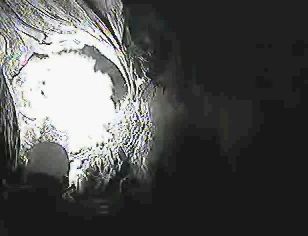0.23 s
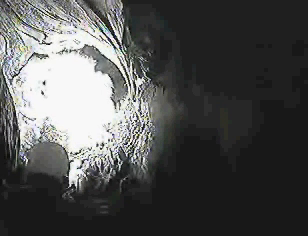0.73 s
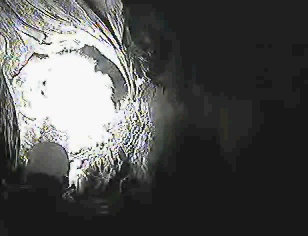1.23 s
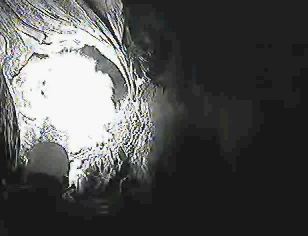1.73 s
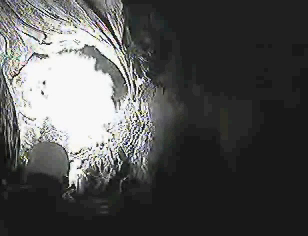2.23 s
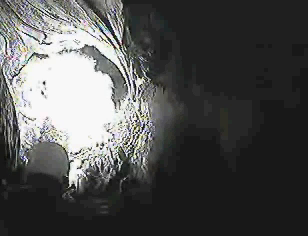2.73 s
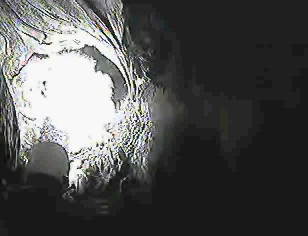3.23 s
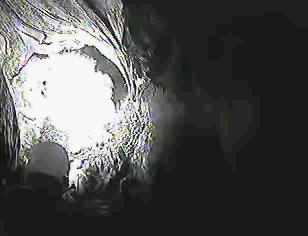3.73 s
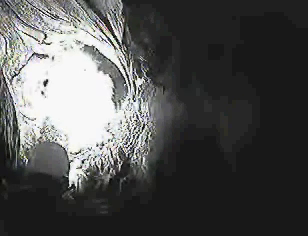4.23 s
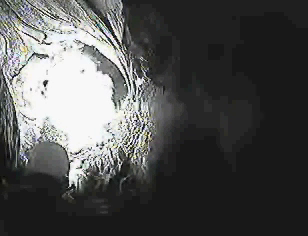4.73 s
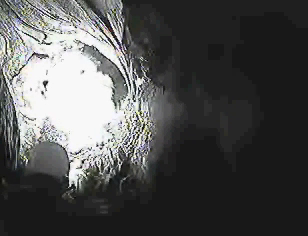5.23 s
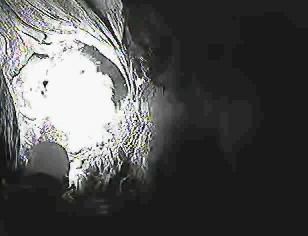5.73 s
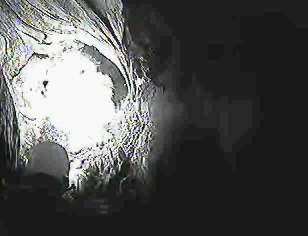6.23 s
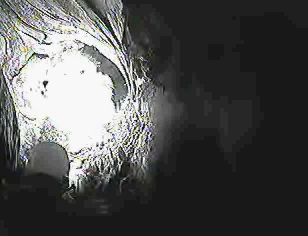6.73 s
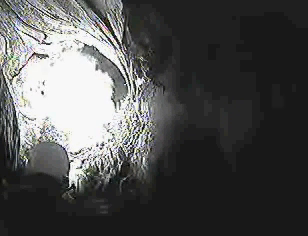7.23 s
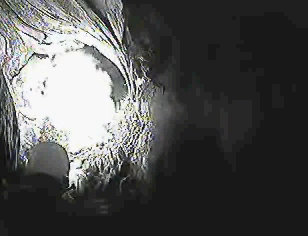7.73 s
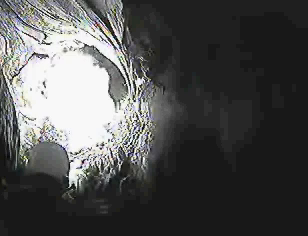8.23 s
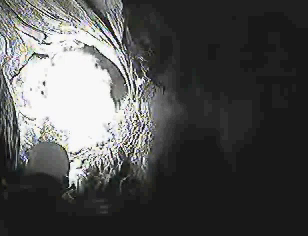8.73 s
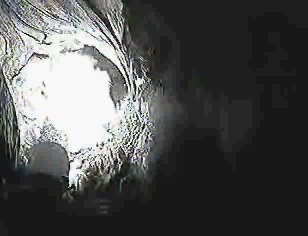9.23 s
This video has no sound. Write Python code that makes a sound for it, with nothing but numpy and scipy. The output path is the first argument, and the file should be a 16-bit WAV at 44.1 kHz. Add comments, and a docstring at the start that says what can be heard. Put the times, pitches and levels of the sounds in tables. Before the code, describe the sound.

A barn owl chick in a nest box hisses harshly four times, so close to a small microphone that the sound distorts. The first hiss is already ending; the others last about half a second each, with small beak clicks. Outside, faint tree frogs, a cricket and short distant whistles sit in a steady background hiss. At the end a far owl gives one long, hoarse screech.

```python
"""A harsh hiss, already under way: a barn owl chick in a nest box, so close to a small camera microphone
that the amplifier overloads. It hisses four times: turbulent air in the throat's resonances, rung on by
the box, with beak clicks as it opens and shuts. Outside and well off the microphone, over a steady
background hiss: tree frogs, a cricket, faint whistles and, at the end, a far owl's long screech."""
import sys
import numpy as np
from scipy import signal
from scipy.io import wavfile

SR = 44100
rng = np.random.default_rng(int(sys.argv[2]) if len(sys.argv) > 2 else 0)


def unload_wav(signal):
    """Save mono or channel-first audio to the path in sys.argv[1] as 16-bit WAV at rate SR, clipped to [-1, 1]."""
    wavfile.write(
        sys.argv[1],
        SR,
        np.round(np.clip(np.atleast_2d(signal).T, -1, 1) * 32767).astype(np.int16),
    )


N = 417627

# spectrum of the steady background outside the box: frequency_hz, relative_db
BACKGROUND_SPECTRUM = [(40, -13.5), (145, -11.5), (190, -4.5), (270, -1), (430, 0.5), (540, -4.5),
                       (880, -5), (1200, -3), (1900, -3), (3400, -8), (4600, -9.5), (8300, -22),
                       (10000, -29.5), (12000, -47.5)]
# croaks of one far tree frog: first_note_last_pulse_s, peak_db
FROG_CROAKS = [(1.041, -52.5), (3.918, -51.3), (6.926, -52.3)]
# the two notes of each croak: last_pulse_delay_s, pulse_count, pitch_hz
FROG_NOTES = [(0, 4, 2260), (.115, 2, 2320)]
# chirps of a distant cricket: middle_s
CRICKET_CHIRPS = [.76, 1.3, 1.819, 2.88, 3.45, 4.06, 4.638, 5.89, 6.391, 6.971]
# faint whistles a long way off: middle_s, length_s, middle_pitch_hz
FAR_WHISTLES = [(.398, 0.35, 2680), (.878, .27, 3130), (1.398, 0.16, 2630), (2.053, 0.36, 2950),
                (3.121, 0.25, 3010), (4.262, .3, 2950), (6.029, 0.33, 3050), (6.4, 0.15, 2620)]
# course of the far owl's voice: time_s, pitch_hz, level_db (before the whistle's and bands' own gains)
SCREECH_CONTOUR = [(8.1, 2198, -73), (8.14, 2244, -63), (8.206, 2270, -67), (8.314, 2148, -56),
                   (8.352, 2094, -62), (8.406, 2117, -55.5), (8.44, 2060, -62), (8.58, 2040, -61),
                   (8.622, 2127, -56), (8.668, 2067, -61), (8.762, 2062, -57.5), (8.8, 1980, -64),
                   (8.986, 2019, -57), (9.202, 2026, -59), (9.346, 1970, -60.5), (9.46, 1966, -64)]
# hoarse bands beside its whistle: pitch_multiple, width_hz, relative_db
SCREECH_HOARSE_BANDS = [(1.01, 132, -6), (1.1, 347, -7.5), (1.34, 500, -13.5)]
# resonances of its rasp: centre_hz, width_hz, relative_db
SCREECH_RASP_BANDS = [(2690, 500, -2.5), (3460, 250, -11), (3960, 420, -2.5), (4630, 300, -9.5),
                      (5420, 290, -6.5), (5750, 210, -2), (6030, 120, -7.5)]
# spectrum of the soft rush of air under each hiss: frequency_hz, relative_db
RUSH_SPECTRUM = [(150, -13), (700, 0), (1300, -6.5), (2400, -3), (3600, 2.5), (5500, 5), (7500, 2),
                 (9500, -9), (12000, -7)]
# beak clicks and one squeak at the microphone: middle_s, peak_db (before overload), length_s, overtone_db
BEAK_CLICKS = [(2.124, -44, .004, -2), (2.5955, -25, .005, 20), (2.5995, -24, .004, 20),
               (2.609, -24, .003, 18), (2.6265, -30, .012, 8), (5.195, -40, .004, 0),
               (5.679, -28, .004, 20), (5.702, -49, .007, -8), (7.307, -35, .003, 2)]
# overtones of each click: pitch_multiple, relative_db
CLICK_OVERTONES = [(3, -3.5), (4, -6.5), (5, -15), (6, -19)]
# the chick's steady throat resonances: centre_hz, width_hz, relative_db
THROAT_RESONANCES = [(3760, 620, -2), (4170, 500, -5), (4590, 520, 0), (5250, 420, -1), (5620, 560, -2),
                     (6150, 400, -4), (6720, 420, -11), (7280, 380, -8), (8200, 750, -10), (8900, 700, -15)]
# its lowest resonance, rising as the beak opens: share_of_hiss, centre_hz, relative_db
GAPE_RESONANCE = [(0, 2614, -9), (.25, 2701, -15), (.45, 3194, -10), (.75, 3304, -2.5), (1, 3295, -7)]
# hisses at the microphone: start_s, end_s, level_db (before overload), air_linger_s
CHICK_HISSES = [(-.37, 0.097, -23, .065), (2.123, 2.594, -22, .015), (5.196, 5.678, -22.5, 0.051),
                (7.31, 7.782, -22, 0.061)]
# tone of the camera's amplifier after the overload: frequency_hz, gain_db
AMPLIFIER_TONE = [(30, -11), (130, -3), (280, 3), (420, 2), (700, -9.5), (1250, 1), (2000, -2.5),
                  (3500, -2), (6000, -1), (8500, -2.5), (10000, -6), (11000, -20), (12000, -28)]


def gain_of(db):
    """Decibels to amplitude."""
    return 10 ** (np.asarray(db) / 20)


def unit_rms(x):
    """Scales to rms 1."""
    return x / np.sqrt(np.mean(x ** 2) + 1e-20)


def add(mix, start_s, sound):
    """Mixes a sound in from start_s, dropping what falls outside the mix."""
    at = round(start_s * SR)
    sound = sound[max(-at, 0):]
    part = mix[max(at, 0):][:len(sound)]
    part += sound[:len(part)]


def coloured(x, spectrum, size=4096):
    """A minimum-phase filter through (frequency_hz, gain_db) points."""
    hz, db = np.transpose(spectrum)
    bin_hz = abs(np.fft.fftfreq(size, 1 / SR))
    log_gain = np.log(gain_of(np.interp(np.log(bin_hz + 1), np.log(hz), db)))
    taps = np.fft.ifft(np.exp(np.conj(signal.hilbert(log_gain)))).real
    return signal.oaconvolve(x, taps)[:len(x)]


def turbulence(hz, width_hz, count):
    """Noise in a steep resonance that may glide, rms 1."""
    pole = np.exp(-np.pi * abs(width_hz) / SR)
    noise = rng.standard_normal(count) + 1j * rng.standard_normal(count)
    band = signal.lfilter([1], np.poly([pole, pole]), noise)
    carrier = np.exp(2j * np.pi * np.cumsum(hz * np.ones(count)) / SR)
    return unit_rms((band * carrier).real)


def waver(hz, count):
    """A random wobble at about hz, rms 1."""
    return turbulence(hz, hz, count)


def echoes(x, t60_s, wet_db):
    """Dense, dying reflections of x."""
    t = np.arange(SR) / SR
    tail = rng.standard_normal(len(t)) * gain_of(-60 * t / t60_s)
    return gain_of(wet_db) * signal.fftconvolve(x, tail / np.linalg.norm(tail))[:N]


def background(hiss_db=-65.5, chorus_db=-73):
    """A steady hiss outside, with a frog chorus so far off that it blurs into one band."""
    steady_hiss = unit_rms(coloured(rng.standard_normal(N), BACKGROUND_SPECTRUM))
    chorus = turbulence(hz=2400, width_hz=450, count=N)
    return gain_of(hiss_db) * steady_hiss + gain_of(chorus_db) * chorus


def tree_frog(pulse_spacing_s=.0165, pulse_s=.01, growth_db=2):
    """One far frog: each note is a quick train of growing pulses that ring the vocal sac."""
    out = np.zeros(N)
    t = np.arange(0, pulse_s, 1 / SR)
    for croak_s, peak_db in FROG_CROAKS:
        for delay_s, count, hz in FROG_NOTES:
            pulse = np.sin(2 * np.pi * hz * t) * np.hanning(len(t))
            for k in range(count):  # counted back from the last, loudest pulse
                middle_s = croak_s + delay_s - k * pulse_spacing_s
                add(out, middle_s - pulse_s / 2, gain_of(peak_db - k * growth_db) * pulse)
    return out + echoes(out, t60_s=.48, wet_db=-8)


def cricket(middle_s, hz=4560, width_hz=90, db=-77, length_s=.27, strokes_per_s=42):
    """A train of wing strokes on one narrow tone, half smeared by distance."""
    t = np.arange(0, length_s, 1 / SR)
    strokes = .5 + .5 * np.sin(np.pi * strokes_per_s * t) ** 2
    chirp = strokes * turbulence(hz, width_hz, len(t)) * signal.windows.tukey(len(t), .5)
    return middle_s - length_s / 2, gain_of(db) * chirp


def far_whistle(middle_s, length_s, hz, width_hz=380, rise_hz_per_s=1150, db=-72.5):
    """A short rising whistle, blurred by distance."""
    t = np.arange(-length_s / 2, length_s / 2, 1 / SR)
    whistle = turbulence(hz + rise_hz_per_s * t, width_hz, len(t))
    return middle_s - length_s / 2, gain_of(db) * whistle * signal.windows.tukey(len(t), .8)


def screech_rasp(t, pitch_hz, start_s=8.2, attack_s=.11, crest_s=8.89, db=-63.5):
    """Noise in resonances that follow the far owl's pitch a little; it swells to one crest and fades."""
    swell_db_per_s, fade_db_per_s = 16.5, 9
    lift = (pitch_hz / np.median(pitch_hz)) ** .5
    rasp = sum(gain_of(band_db) * turbulence(hz * lift, width_hz, len(t))
               for hz, width_hz, band_db in SCREECH_RASP_BANDS)
    swell_db = np.minimum(swell_db_per_s * (t - crest_s), fade_db_per_s * (crest_s - t))
    attack = np.clip((t - start_s) / attack_s, 0, 1)
    return gain_of(db + swell_db) * attack * rasp


def far_screech(whistle_db=-2, jitter_hz=42, hoarse_db=-2):
    """A far owl: an unsteady, sinking whistle with hoarse bands beside it and a rasp above."""
    time_s, contour_hz, level_db = np.transpose(SCREECH_CONTOUR)
    t = np.arange(time_s[0], N / SR, 1 / SR)
    pitch_hz = np.interp(t, time_s, contour_hz)
    unsteady_hz = pitch_hz + jitter_hz * waver(hz=60, count=len(t))
    whistle = np.sqrt(2) * np.sin(2 * np.pi * np.cumsum(unsteady_hz) / SR)
    hoarse = sum(gain_of(band_db) * turbulence(multiple * pitch_hz, width_hz, len(t))
                 for multiple, width_hz, band_db in SCREECH_HOARSE_BANDS)
    voice = gain_of(whistle_db) * whistle + gain_of(hoarse_db) * hoarse
    voice *= gain_of(np.interp(t, time_s, level_db))
    return time_s[0], voice + screech_rasp(t, pitch_hz)


def outside():
    """Everything beyond the box, well off the microphone."""
    out = background() + tree_frog()
    for row in FAR_WHISTLES:
        add(out, *far_whistle(*row))
    for middle_s in CRICKET_CHIRPS:
        add(out, *cricket(middle_s))
    add(out, *far_screech())
    return out


def after_ring(start_s=2.634, hz=2360, db=-52, t60_s=.22):
    """A faint tone that rings on after the chick's squeak."""
    t = np.arange(0, t60_s, 1 / SR)
    return start_s, gain_of(db - 60 * t / t60_s) * np.sin(2 * np.pi * hz * t)


def air_rush(start_s, end_s, linger_s, db=-43, onset_s=.009):
    """Air starts to flow with the hiss and runs on for a moment after the throat lets go."""
    t = np.arange(0, end_s + linger_s - start_s, 1 / SR)
    flow = np.minimum(t / onset_s, 1) * np.minimum((t[-1] - t) / linger_s, 1)
    air = unit_rms(coloured(rng.standard_normal(len(t)), RUSH_SPECTRUM))
    return start_s, gain_of(db) * air * flow


def beak_click(middle_s, peak_db, length_s, overtone_db, pitch_hz=1230, sag=.27):
    """A few cycles of a sagging pitch, its overtones lifted by the throat."""
    position = np.linspace(-.5, .5, int(length_s * SR))
    phase = 2 * np.pi * np.cumsum(pitch_hz * (1 - sag * position)) / SR
    overtones = sum(gain_of(db) * np.sin(multiple * phase + rng.uniform(0, 2 * np.pi))
                    for multiple, db in CLICK_OVERTONES)
    tone = (np.sin(phase) + gain_of(overtone_db) * overtones) * np.cos(np.pi * position) ** 2
    return middle_s - length_s / 2, gain_of(peak_db) * tone / abs(tone).max()


def hiss(start_s, end_s, level_db, rise_s=.032, fall_s=.008, gape_width_hz=480):
    """Voiceless air through the throat's resonances; the beak opens wider as the hiss goes on."""
    t = np.arange(0, end_s - start_s, 1 / SR)
    progress = t / t[-1]
    # the lower resonances come out only once the beak is well open
    muffled_below_hz, shut_db, open_share = 4300, -5, .88
    muffle_db = np.interp(progress, [0, open_share], [shut_db, 0])
    air = np.zeros(len(t))
    for hz, width_hz, db in THROAT_RESONANCES:
        band = np.sqrt(width_hz) * turbulence(hz, width_hz, len(t))
        air += gain_of(db + muffle_db * (hz < muffled_below_hz)) * band
    share, gape_hz, gape_db = np.transpose(GAPE_RESONANCE)
    lowest_hz = np.interp(progress, share, gape_hz)
    lowest_band = np.sqrt(gape_width_hz) * turbulence(lowest_hz, gape_width_hz, len(t))
    air += gain_of(np.interp(progress, share, gape_db)) * lowest_band
    pressure = np.minimum(t / rise_s, 1) * np.minimum((t[-1] - t) / fall_s, 1)
    return start_s, gain_of(level_db) * unit_rms(air) * pressure ** 2


def chick():
    """The chick, right at the microphone; the box rings briefly, the space around it longer."""
    out = np.zeros(N)
    for start_s, end_s, level_db, linger_s in CHICK_HISSES:
        add(out, *hiss(start_s, end_s, level_db))
        add(out, *air_rush(start_s, end_s, linger_s))
    for row in BEAK_CLICKS:
        add(out, *beak_click(*row))
    add(out, *after_ring())
    box = echoes(out, t60_s=.13, wet_db=-23)
    surroundings = echoes(out, t60_s=.43, wet_db=-30.5)
    return out + box + surroundings


def overload(x, ceiling_db=-32, bias=.13, waver_db=.39):
    """The amplifier flattens peaks lopsidedly; difference tones add a low rasp, and the level wavers."""
    ceiling = gain_of(ceiling_db)
    flattened = ceiling * (np.tanh(x / ceiling + bias) - np.tanh(bias))
    radius, delayed_hz = .72, 7800
    feedback = np.array([1, -2 * radius * np.cos(2 * np.pi * delayed_hz / SR), radius ** 2])
    delayed = signal.lfilter(feedback[::-1], feedback, flattened)
    return coloured(delayed, AMPLIFIER_TONE) * gain_of(waver_db * waver(hz=9.1, count=N))


def scene():
    """One microphone in the nest box; only the chick is near enough to overload the amplifier."""
    return (overload(chick()) + outside())[None]


def record(dry, dc_offset=-.0028, band_limit_hz=12100):
    """The camera adds a small steady offset and cuts off the top treble."""
    lowpass = signal.firwin(511, band_limit_hz, window=("kaiser", 9), fs=SR)
    return signal.oaconvolve(dry + dc_offset, lowpass[None], "same")


dry = scene()
out = record(dry)
unload_wav(out)
```